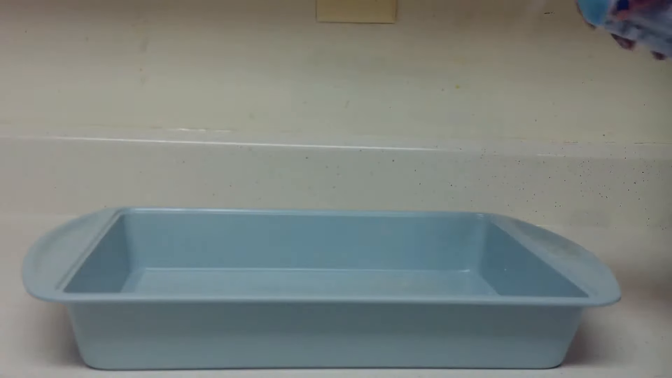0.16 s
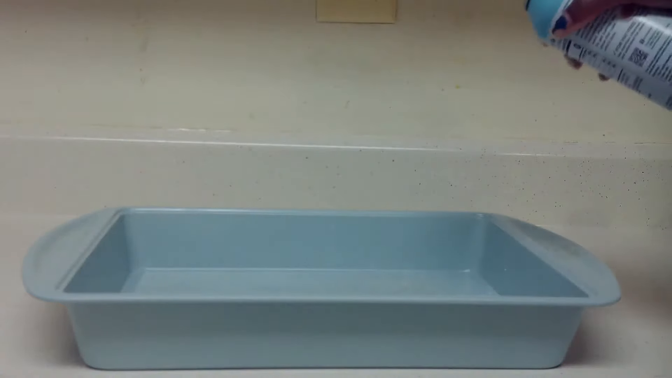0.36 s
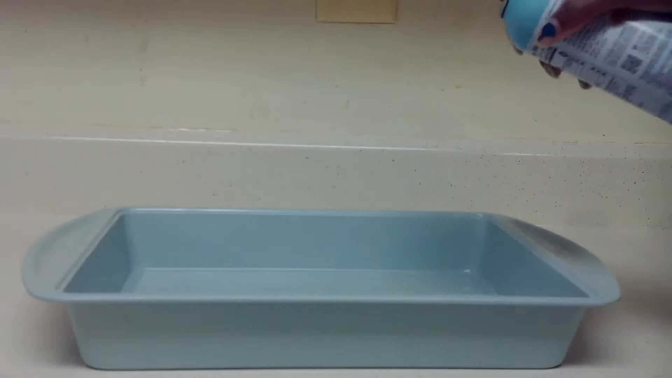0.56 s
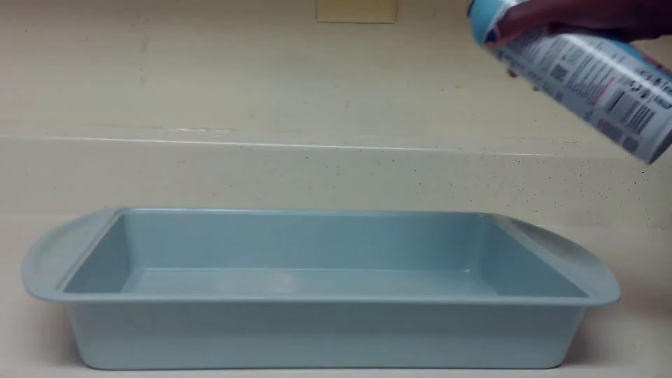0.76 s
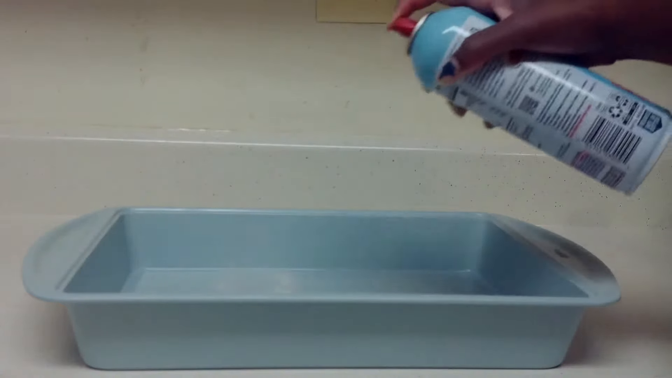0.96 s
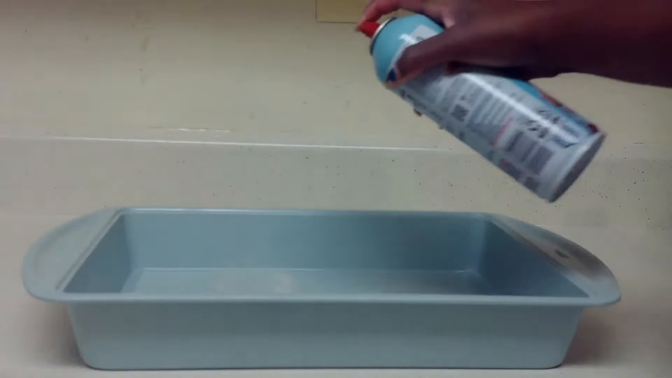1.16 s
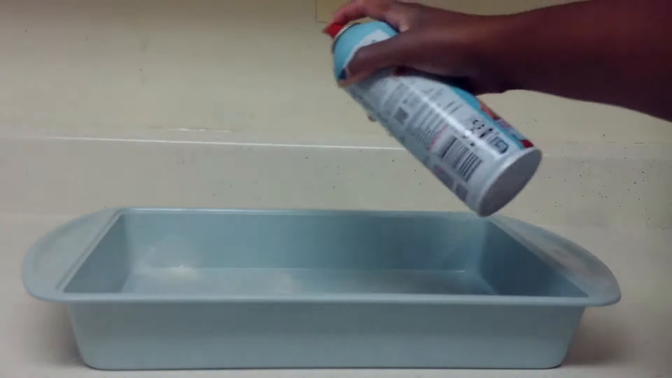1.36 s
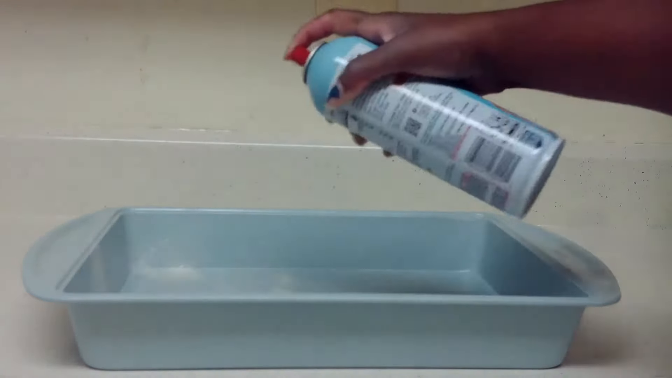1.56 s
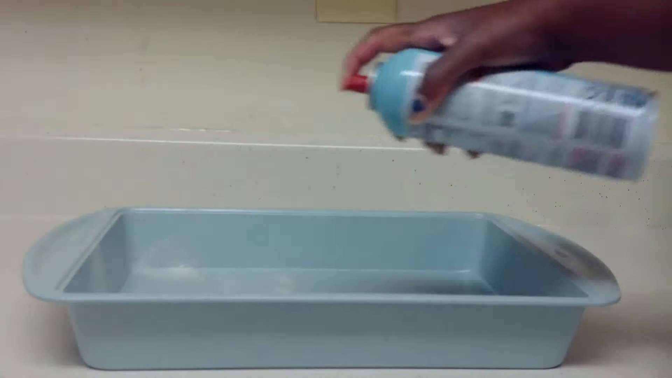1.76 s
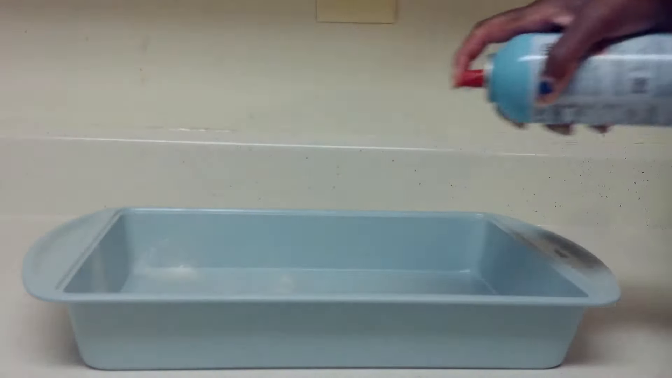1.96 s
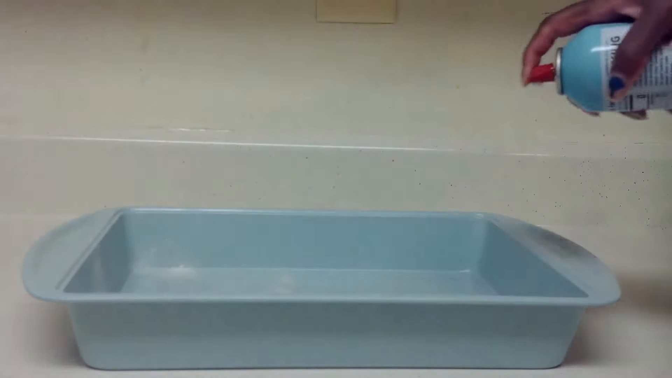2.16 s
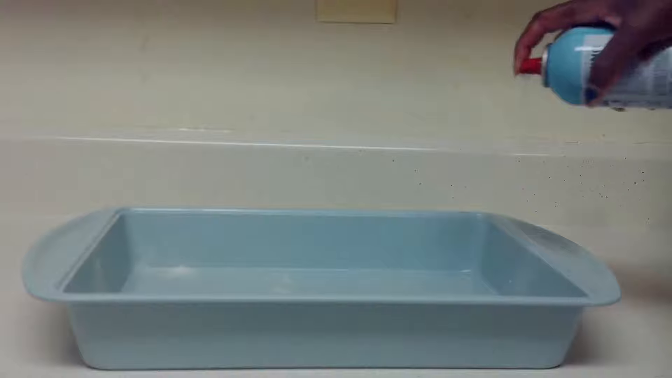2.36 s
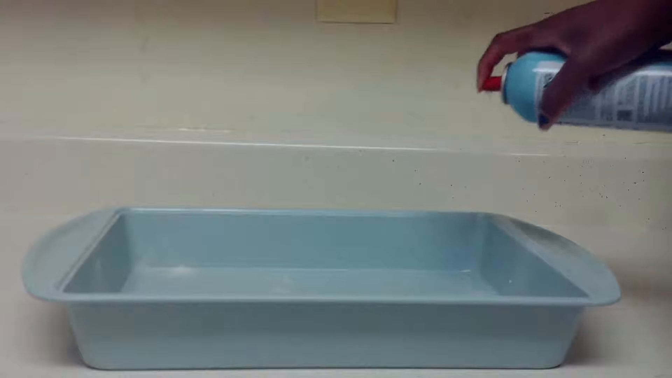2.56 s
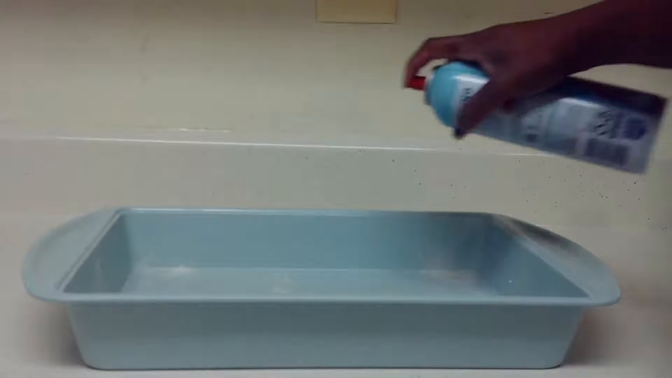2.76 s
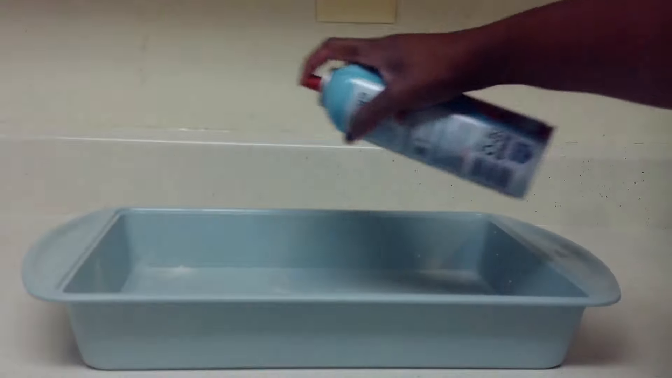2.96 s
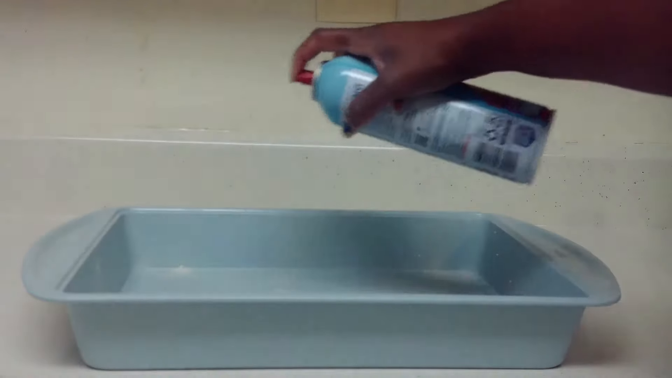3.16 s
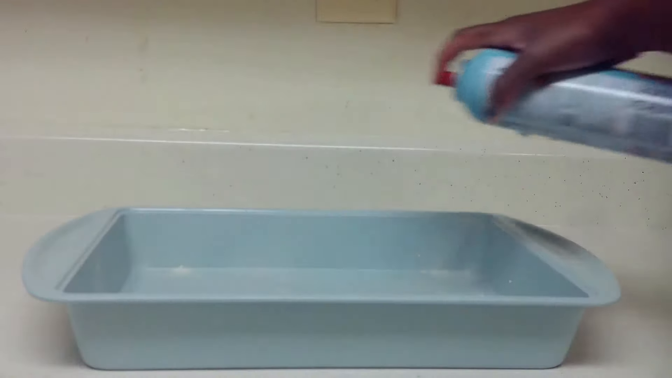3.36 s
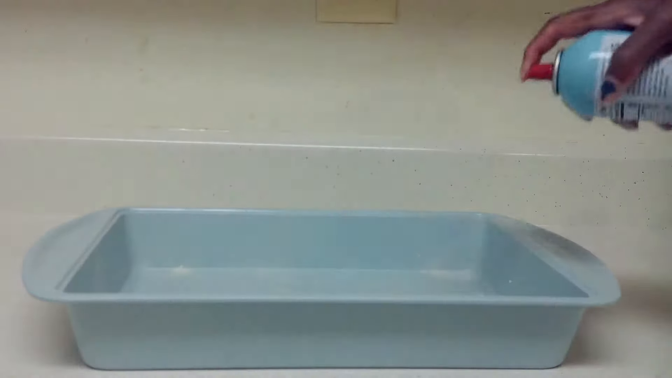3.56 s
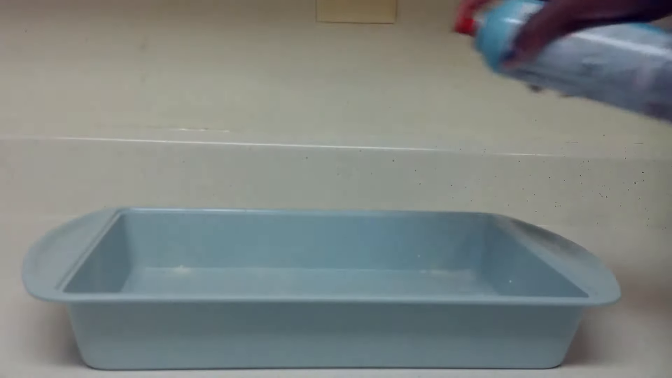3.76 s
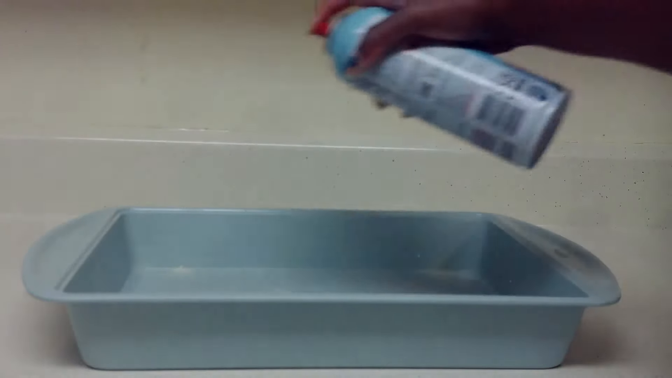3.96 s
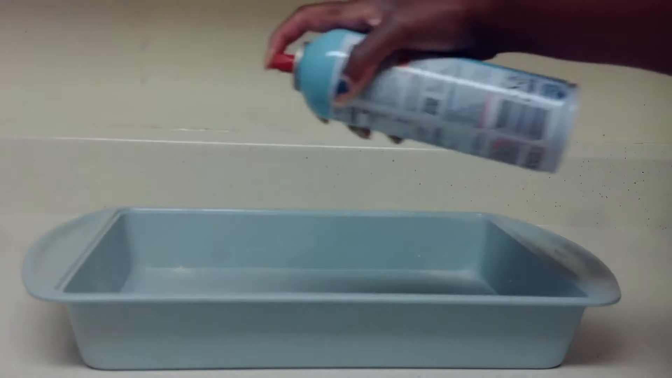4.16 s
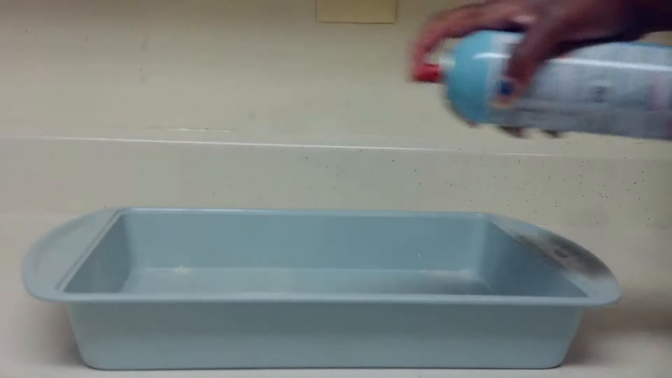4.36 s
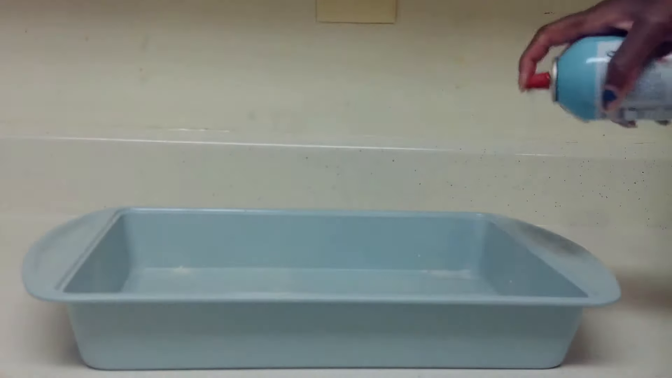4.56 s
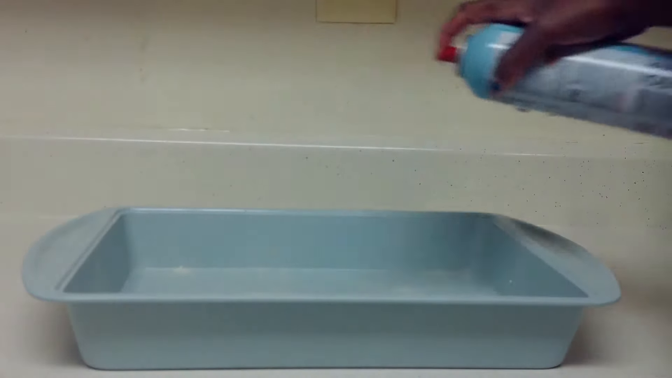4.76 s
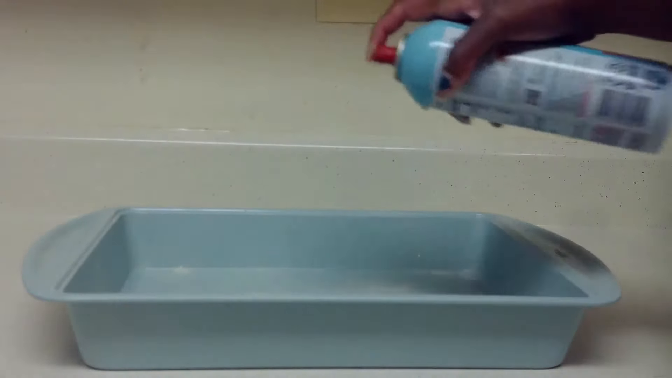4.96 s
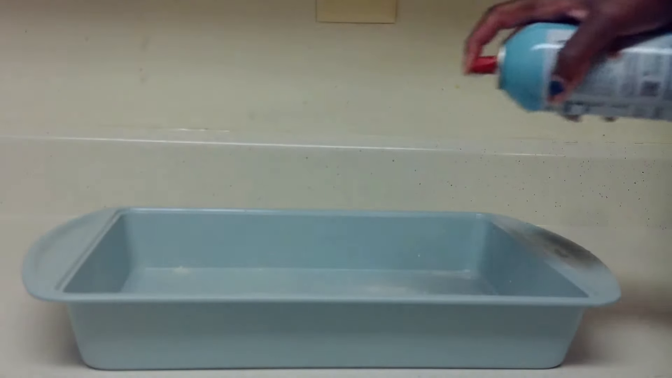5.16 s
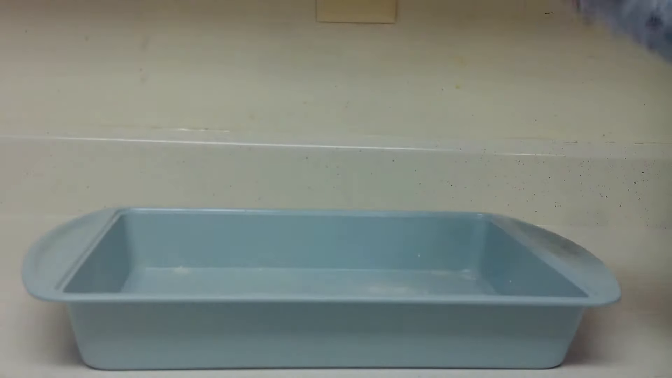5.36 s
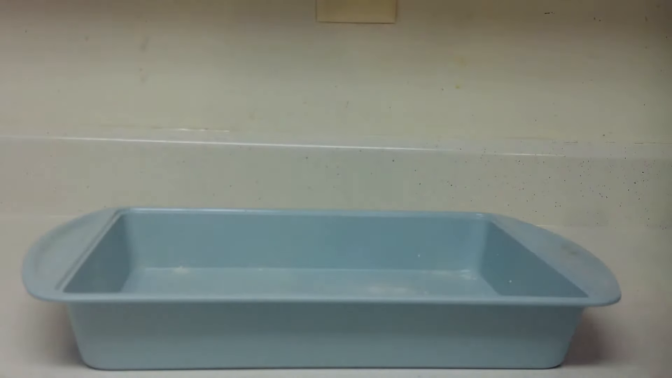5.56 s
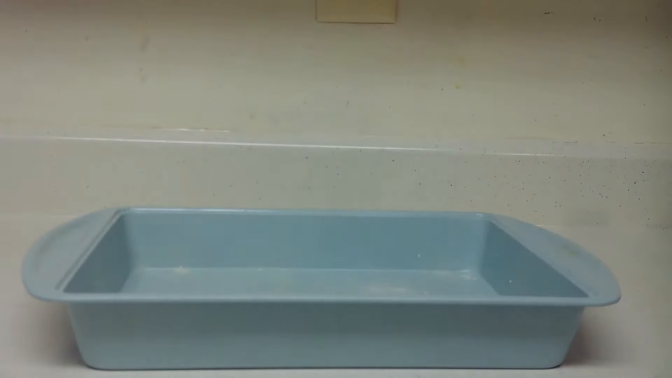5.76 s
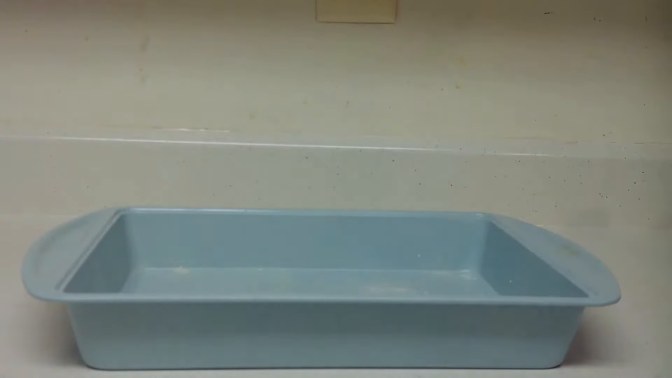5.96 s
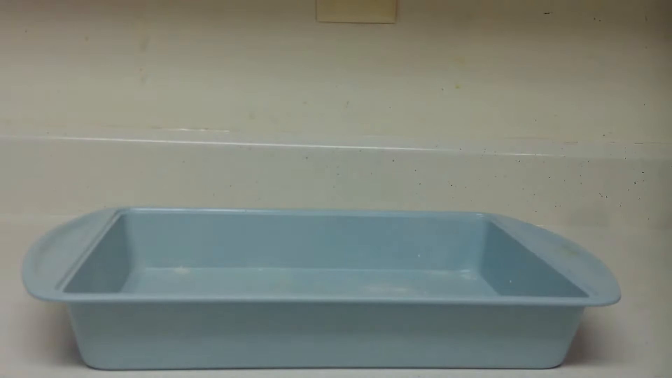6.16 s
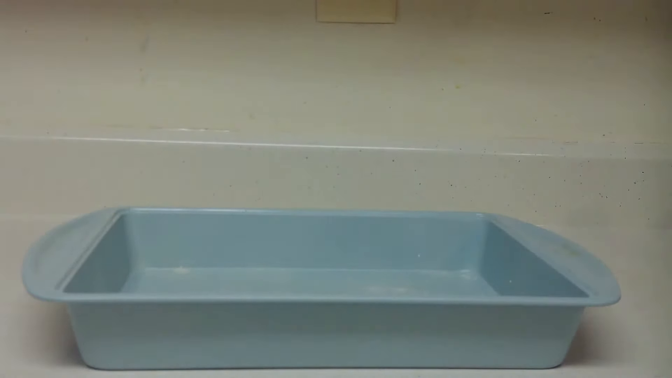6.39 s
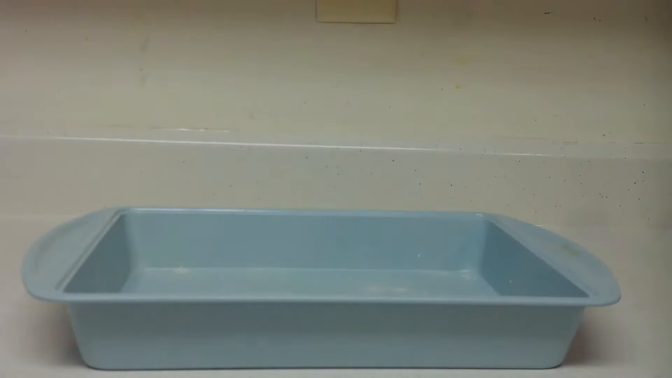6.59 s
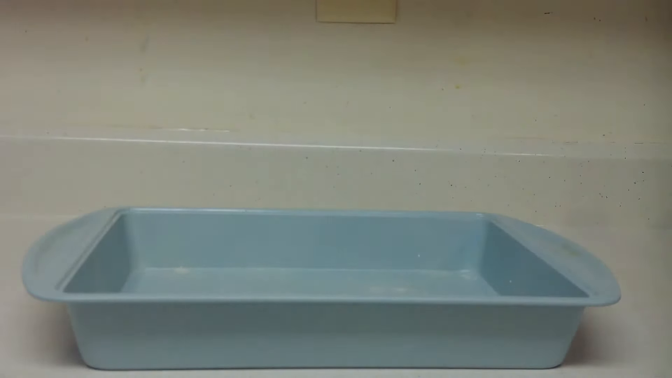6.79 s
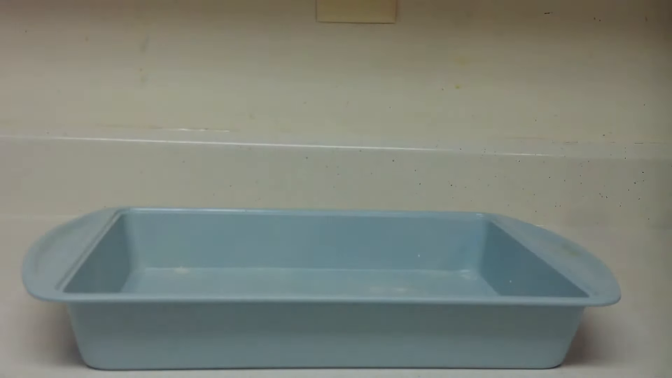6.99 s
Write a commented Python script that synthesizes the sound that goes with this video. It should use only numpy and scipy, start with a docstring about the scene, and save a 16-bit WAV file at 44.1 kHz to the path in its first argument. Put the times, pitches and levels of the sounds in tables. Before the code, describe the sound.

An aerosol can sprays a baking pan in quick hissing puffs, followed by a faint rustle, a click and soft knocks.

```python
"""An aerosol can greases a baking pan with twenty quick puffs, close by on a kitchen counter. Each puff starts
as a duller hiss and its bright top comes in a moment later; the sputtering jet throws mist into the hollow of
the pan; now and then a gob of oil spits and splats, and the kitchen rings briefly. Afterwards things are
handled with a faint rustle, a click and a few soft knocks, over quiet air."""
import sys
import numpy as np
from scipy import signal
from scipy.fft import rfft, irfft, next_fast_len
from scipy.io import wavfile
from scipy.ndimage import uniform_filter1d

SR = 44100
rng = np.random.default_rng(int(sys.argv[2]) if len(sys.argv) > 2 else 0)


def generate_wav(sig):
    """Save sig (samples, or channels by samples) to the path in sys.argv[1] as 16-bit PCM at SR."""
    pcm = np.round(np.clip(np.atleast_2d(sig).T, -1, 1) * 32767).astype(np.int16)
    wavfile.write(sys.argv[1], SR, pcm)


N = 310023
TIME = np.arange(N) / SR


def gain_of(db):
    """Decibels to amplitude."""
    return 10 ** (np.asarray(db) / 20)


def unit_rms(x):
    """Scales to rms 1."""
    return x / np.sqrt(np.mean(x ** 2) + 1e-20)


def curve_at(points, hz):
    """Reads a table along a log-frequency axis."""
    point_hz, value = np.transpose(points)
    return np.interp(np.log(hz + 1), np.log(point_hz + 1), value)


def add(mix, start_s, sound):
    """Lays a sound into the mix, trimming what falls outside."""
    at = round(start_s * SR)
    sound = sound[max(-at, 0):]
    part = mix[max(at, 0):][:len(sound)]
    part += sound[:len(part)]


def hiss(colour, size=N):
    """Noise of rms 1 with the given spectrum."""
    length = next_fast_len(size, True)
    shape = gain_of(curve_at(colour, np.fft.rfftfreq(length, 1 / SR)))
    return unit_rms(irfft(rfft(rng.standard_normal(length)) * shape, length)[:size])


def wobble(per_s, size=N):
    """Random drift of rms 1 that takes a new value per_s times a second."""
    return unit_rms(np.interp(TIME[:size] * per_s, np.arange(size), rng.standard_normal(size)))


def lowpass(x, hz):
    """The part of a sound under a soft edge."""
    return signal.sosfiltfilt(signal.butter(3, hz, fs=SR, output="sos"), x)


def stroke(t, start, stop, db, rise_s, fall_s, swell_db=0):
    """Envelope that builds from start, ramps by swell_db around db, and dies away after stop."""
    since = np.maximum(t - start, 0)
    progress = np.minimum(since / max(stop - start, .01), 1)
    attack = 1 - np.exp(-since / rise_s)
    release = np.exp(-np.maximum(t - stop, 0) / fall_s)
    return gain_of(db + swell_db * (progress - .5)) * attack * release


# The dark colour of the room tone. Each row: frequency in Hz, relative level in dB.
AIR_COLOUR = [(20, 4.5), (40, 0), (62, -4.5), (120, -2), (250, -1.5), (550, -2), (1000, -6.5),
              (2000, -13.5), (4000, -18), (10500, -19), (13000, -22), (15500, -29)]


def room_tone(level_db=-63, waver_db=2.0, rumble_hz=170):
    """Soft, even air noise whose low end wavers."""
    air = gain_of(level_db + .7 * wobble(per_s=27)) * hiss(AIR_COLOUR)
    waver = unit_rms(gain_of(waver_db * wobble(per_s=7.8)))
    return air + (waver - 1) * lowpass(air, rumble_hz)


# The kitchen's short reverb. Each row: frequency in Hz, seconds to fade by 60 dB.
KITCHEN_DECAY = [(200, 0.306), (700, 0.27), (1500, 0.3), (4000, 0.28), (8000, 0.25), (11000, 0.18),
                 (15000, 0.18)]


def kitchen(x, wet_db, dry_db, predelay_s=.002):
    """Direct sound plus dense reflections from counter and walls; the treble dies first."""
    size = SR // 2
    reflections = rng.choice([-1., 1.], size) * (rng.random(size) < .1)
    hz, t, spectrum = signal.stft(reflections, SR, nperseg=256)
    decay = gain_of(-60 * t / curve_at(KITCHEN_DECAY, hz)[:, None])
    tail = signal.istft(spectrum * decay, SR, nperseg=256)[1][:size]
    tail *= np.arange(size) > predelay_s * SR
    direct = gain_of(dry_db) * signal.unit_impulse(size)
    return signal.fftconvolve(x, direct + gain_of(wet_db) * tail / np.linalg.norm(tail))


# A slide's airy swish and its duller rub. Each row: frequency in Hz, relative level in dB.
SWISH_COLOUR = [(1000, -23), (4000, -7), (7000, -4), (10000, 0.5), (12500, -6), (15000, -29)]
RUB_COLOUR = [(150, -10.5), (500, -13), (1400, -3.5), (3500, -6), (7000, -17)]
# Slides of the hand. Each row: start and stop in seconds, relative swish and rub levels in dB.
SLIDES = [(5.658, 5.74, -60.5, -88), (5.738, 5.775, -55.5, -71), (5.83, 6.086, -63.5, -70),
          (6.101, 6.15, -56.5, -55), (6.17, 6.303, -69, -66), (6.312, 6.348, -54, -54),
          (6.37, 6.611, -67, -61), (6.624, 6.674, -55, -61)]


def rustle(grain_db=1.5, rise_s=.0073, fall_s=.048):
    """A faint, grainy rustle of things being moved: each slide starts, holds and dies away."""
    swish_power, rub_power = np.zeros((2, N))
    for start, stop, swish_db, rub_db in SLIDES:
        swish_power += stroke(TIME, start, stop, swish_db, rise_s, fall_s) ** 2
        rub_power += stroke(TIME, start, stop, rub_db, rise_s, fall_s) ** 2
    grain = unit_rms(gain_of(grain_db * wobble(per_s=330)))
    swish = gain_of(-1) * np.sqrt(swish_power) * hiss(SWISH_COLOUR)
    rub = gain_of(-3) * np.sqrt(rub_power) * hiss(RUB_COLOUR)
    return grain * (swish + rub)


# A contact's dull clack and crisp tick. Each row: frequency in Hz, relative level in dB.
CLACK_COLOUR = [(100, -28), (400, -4), (800, -2), (1200, 7.5), (3600, -3), (4800, -17.5), (12000, -25)]
TICK_COLOUR = [(500, -17), (3000, -16), (6000, 6), (9500, 0), (13000, -12), (16000, -25)]
# Contact noise by kind of blow. Each entry: relative clack and tick levels in dB.
CONTACT_LEVELS = {"click": (-1.1, -17), "tap": (-12, -11), "tick": (-5, 13), "tink": (-1, 9),
                  "thud": (-6.5, -22), "clatter": (-7.5, -14)}
# The ring by kind of blow. Each row: pitch in Hz, relative level in dB, seconds to fade by 60 dB.
BLOW_MODES = {"click": [(1193, -2, 0.023), (2300, -5, .014), (3500, -1.5, 0.018)],
              "tap": [(1080, 1, 0.015)], "tick": [(3180, -2, .018)], "tink": [(1620, -2, 0.088),
              (4610, 2, 0.065)], "thud": [(620, -6, 0.043), (652, -2.5, 0.049)],
              "clatter": [(1364, -2.5, 0.035), (1490, -6, 0.039)]}
# Blows as things are handled. Each row: start in seconds, strength in dB, kind of blow.
BLOWS = [(5.752, -64, "tick"), (5.931, -62, "tick"), (6.095, -59, "tick"), (6.116, -36.5, "click"),
         (6.206, -44.5, "tap"), (6.32, -58.5, "tick"), (6.506, -53.5, "tink"), (6.541, -56.5, "tink"),
         (6.645, -33.5, "thud"), (6.652, -39, "thud"), (6.671, -40, "thud"), (6.944, -33, "clatter"),
         (6.961, -38, "clatter"), (6.987, -33, "clatter"), (6.999, -31.5, "clatter"),
         (7.022, -37, "clatter")]


def knocks(clack_t60=.062, tick_t60=.054):
    """Each blow rings the short modes of the thing struck, under a clack and a tick."""
    t = np.arange(SR // 4) / SR
    ring, clack, tick = np.zeros((3, N))
    for start, blow_db, kind in BLOWS:
        clack_db, tick_db = CONTACT_LEVELS[kind]
        for hz, mode_db, t60 in BLOW_MODES[kind]:
            add(ring, start, gain_of(blow_db + mode_db - 60 * t / t60) * np.sin(2 * np.pi * hz * t))
        add(clack, start, gain_of(blow_db + clack_db - 60 * t / clack_t60))
        add(tick, start, gain_of(blow_db + tick_db - 60 * t / tick_t60))
    return ring + gain_of(-3) * clack * hiss(CLACK_COLOUR) + gain_of(-6) * tick * hiss(TICK_COLOUR)


# Stray gobs of oil. Each row: start in seconds, relative spit and splat levels in dB.
OIL_GOBS = [(.668, -15, -55.5), (2.101, -11.5, -39), (3.193, -22.5, -49.5), (4.243, -10.5, -47.5),
            (4.501, -11.5, -51.5), (4.862, -33, -26.5)]


def gobs(rise_s=.001295, fall_s=.0094, size=SR // 10):
    """A gob is one short burst: a bright spit from the nozzle with a duller splat on the pan."""
    t, out = TIME[:size], np.zeros(N)
    burst = (1 - np.exp(-t / rise_s)) * np.exp(-t / fall_s)
    for start, spit_db, splat_db in OIL_GOBS:
        spit = gain_of(spit_db) * hiss(JET_COLOUR, size)
        splat = gain_of(splat_db) * hiss(SPLASH_COLOUR, size)
        add(out, start, burst * (spit + splat))
    return out


# A puff's duller onset, the bright jet and mist striking the pan; gobs share the last two.
# Each row: frequency in Hz, relative level in dB.
DULL_ONSET_COLOUR = [(300, -21), (2000, -13.5), (3200, -6.5), (5600, -5.5), (8300, 7), (9300, -37),
                     (15000, -31)]
JET_COLOUR = [(300, -49.5), (1500, -29), (2450, -27), (2750, -21), (3400, -19), (5000, -16.5), (5600, -18),
              (8000, -10.5), (9300, -5.5), (10500, 0), (12700, -2.5), (13600, -10), (14800, -13),
              (15700, -22)]
SPLASH_COLOUR = [(100, -30.5), (250, -11), (550, -5), (750, -5), (1000, -4), (1750, 1), (2100, 0.5),
                 (2800, 6), (4500, -13), (9000, -30)]


def puff(press, flight_s=.0023, closing_s=.0067, fill_s=.018, hollow_db=-9, size=SR // 3):
    """A duller hiss, then the bright jet; the mist lands a moment later and rings the pan's hollow."""
    start, bright, lift, onset_db, jet_db, swell_db, aim_db, hollow_hz = press
    t = start + TIME[:size]
    tick = gain_of(-40) * np.exp(-(t - start) / .0032)
    onset = stroke(t, start, bright, onset_db, rise_s=.0022, fall_s=.01)
    dull_onset = gain_of(2.2) * np.hypot(tick, onset) * hiss(DULL_ONSET_COLOUR, size)
    flow = stroke(t, bright - .001, lift + closing_s, jet_db, .0058, .0058, swell_db)
    jet = flow * hiss(JET_COLOUR, size)
    # The jet starts thin and fills out below; aiming into the pan adds to that lower hiss.
    body_db = .51 * aim_db - np.exp(-np.maximum(t - bright, 0) / fill_s)
    jet += (gain_of(body_db) - 1) * lowpass(jet, hz=8300)
    landing = stroke(t, bright + flight_s, lift + flight_s, jet_db, .008, .00843, swell_db)
    splash = gain_of(aim_db - 28.5) * landing * hiss(SPLASH_COLOUR, size)
    mist = gain_of(-.09) * jet + splash
    hollow = gain_of(hollow_db) * signal.lfilter(*signal.iirpeak(hollow_hz, Q=5.5, fs=SR), mist)
    # Oil and gas leave the nozzle in uneven slugs.
    sputter_db = 2 * wobble(per_s=900, size=size) + 1.04 * wobble(per_s=90.4, size=size)
    return unit_rms(gain_of(sputter_db)) * (mist + hollow + dull_onset)


# Presses of the nozzle. Each row: start, entry of the bright top and finger lift in seconds, relative
# onset and jet levels in dB, swell of the jet in dB, aim into the pan in dB, ring of the hollow in Hz.
PRESSES = [(-.06, -0.04, 0.016, -32, -14.5, 3, 1, 3380), (.174, 0.182, 0.25, -37.5, -17, 3.5, 5, 2750),
           (0.402, 0.424, 0.51, -32, -14.5, -0.5, -2, 3280), (0.656, 0.658, 0.74, -36, -16.5, 2.5, 1, 4730),
           (0.902, .914, 1.019, -39, -15, 0, 0.4, 3200), (1.206, 1.231, 1.308, -34, -17, -5.5, 1, 4000),
           (1.51, 1.523, 1.608, -41, -17, 2, 0, 6420), (1.796, 1.811, 1.897, -42, -16, 4, -2, 6850),
           (2.07, 2.099, 2.162, -33.5, -15.5, -5.5, -1, 2484),
           (2.346, 2.355, 2.444, -37.5, -18.5, -1.3, -2.5, 2400),
           (2.606, 2.615, 2.699, -38.5, -15, 3, -1.5, 2750),
           (2.881, 2.898, 2.979, -36.5, -17, -1, 5.5, 1370), (3.161, 3.186, 3.26, -48.5, -15.5, 5, 5, 3240),
           (3.425, 3.441, 3.5246, -35, -15.5, 4.5, 2.5, 1730),
           (3.695, 3.698, 3.778, -35, -18, 4.5, 3, 1780),
           (3.948, 3.957, 4.053, -35.5, -18, 2.5, -2.5, 7160),
           (4.222, 4.246, 4.34, -37, -15.5, 2, -2.5, 2400), (4.479, 4.498, 4.592, -31.5, -15, 0, -2, 3350),
           (4.749, 4.756, 4.853, -36, -14.5, 4, -2, 3440), (5.027, 5.045, 5.178, -39, -17, -0.5, -2, 3320)]


def spray(wall_delay_s=.0021, wall_db=-11):
    """The can moves between presses, so each puff meets the wall and the room differently."""
    out = np.zeros(N)
    for press in PRESSES:
        start, sound = press[0], puff(press)
        add(out, start, kitchen(sound, wet_db=-2.5, dry_db=-3))
        add(out, start + wall_delay_s * rng.uniform(.9, 1.1), gain_of(wall_db) * sound)
    return out


# Moments when the top of the hiss opens wide.
# Each row: start and stop in seconds, first and last phase turn of each side in radians.
WIDE_MOMENTS = [(.205, 0.266, .58, 1.47), (0.413, 0.519, 0.86, 1.6), (1.925, 1.96, 1, 0.84),
                (2.105, 2.17, 0.46, 1.53), (2.921, 2.96, 1, 0.53), (3.446, 3.518, .85, 1.46),
                (4.785, 4.841, .8, 1.5), (5.059, 5.19, .52, 1.53)]


def widen(x, above_hz=8900, patchiness=.6):
    """The sound sits in the centre, but now and then its top spreads patchily between the ears."""
    hz, t, spectrum = signal.stft(x, SR, nperseg=512)
    turn = np.zeros(len(t))
    for start, stop, first, last in WIDE_MOMENTS:
        gate = np.interp(t, [start - .008, start, stop, stop + .0099], [0, 1, 1, 0])
        turn += gate * np.interp(t, [stop - .03, stop - .014], [first, last])
    patches = uniform_filter1d(rng.standard_normal(spectrum.shape), size=8, axis=0)
    patches = unit_rms(uniform_filter1d(patches, size=7, axis=1))
    patchy_turn = np.clip(turn + patchiness * np.sin(2 * turn) * patches, 0, np.pi / 2)
    phase = (hz > above_hz)[:, None] * patchy_turn
    left, right = spectrum * np.exp(1j * phase), spectrum * np.exp(-1j * phase)
    return signal.istft(np.array([left, right]), SR, nperseg=512)[1][:, :N]


def scene():
    """Spray, gobs and knocks ring in the kitchen, over a dry rustle and the room tone."""
    impacts = kitchen(knocks() + gobs(), wet_db=-6, dry_db=-2)[:N]
    return widen(spray() + impacts + rustle() + room_tone())


def record(dry):
    """A steep high cut takes off the very top of the hiss."""
    high_cut = signal.firwin(511, cutoff=15750, window=("kaiser", 9), fs=SR)
    return signal.oaconvolve(dry, high_cut[None], "same", axes=1)


dry = scene()
out = record(dry)
generate_wav(out)
```